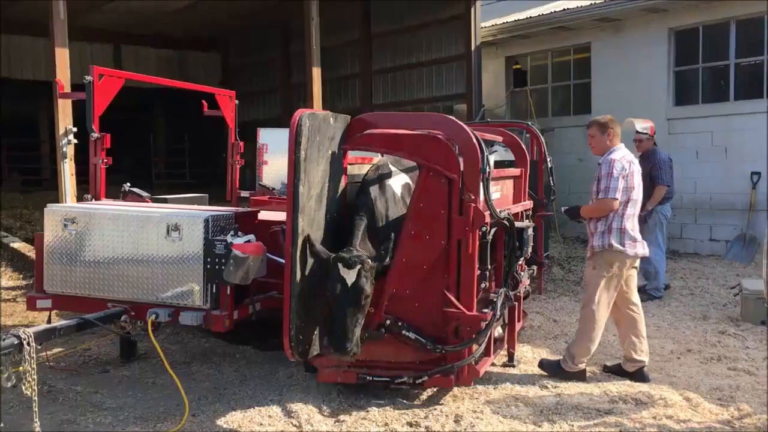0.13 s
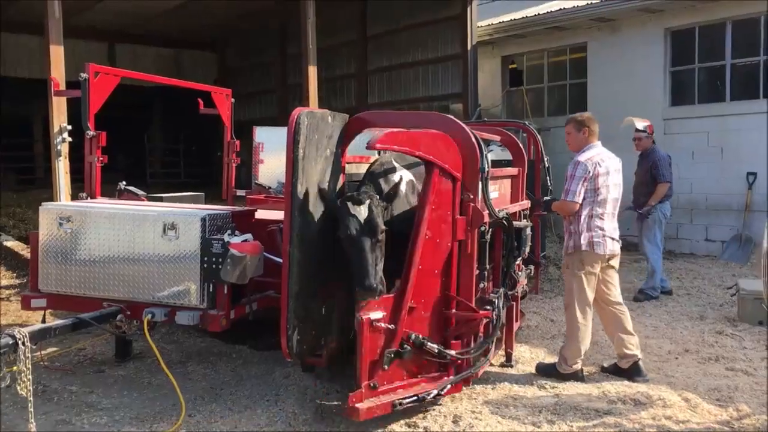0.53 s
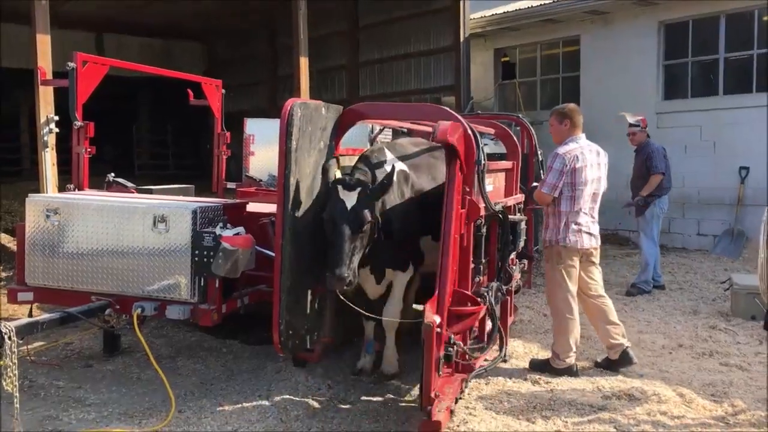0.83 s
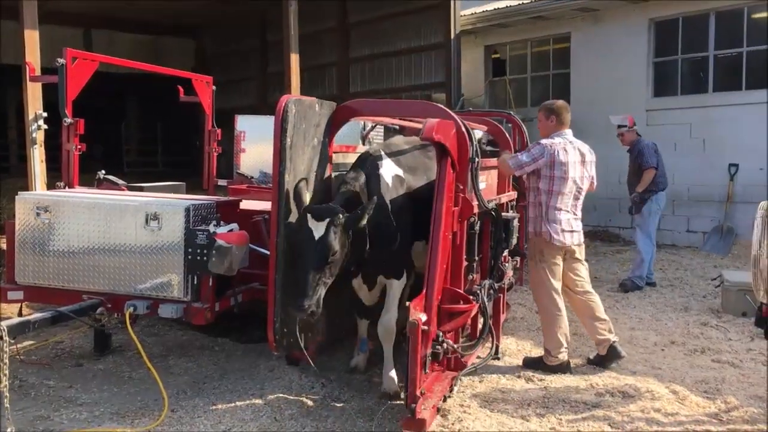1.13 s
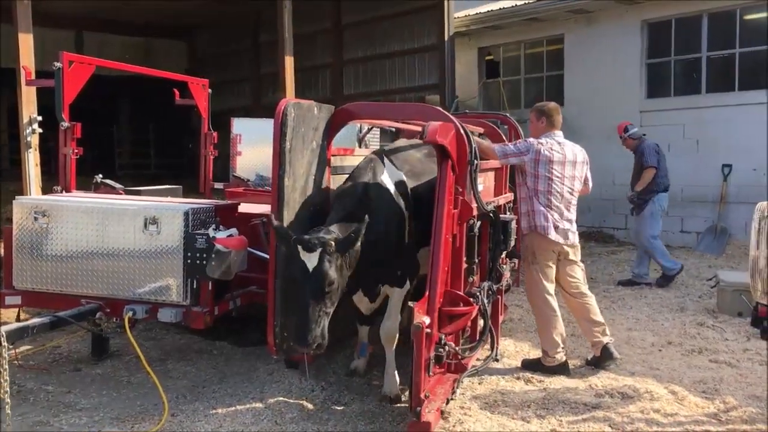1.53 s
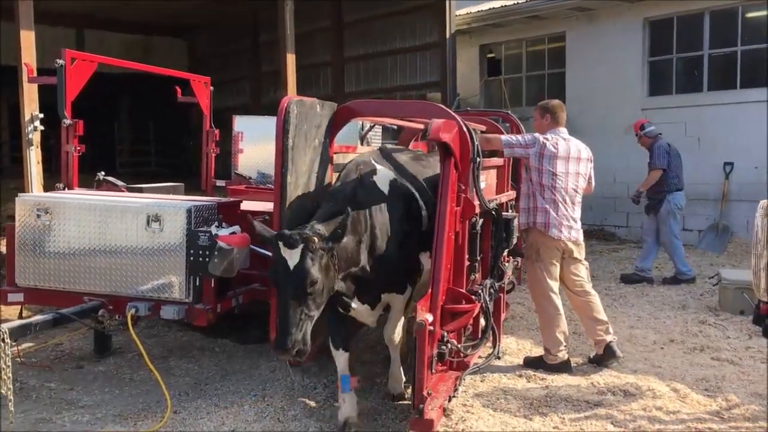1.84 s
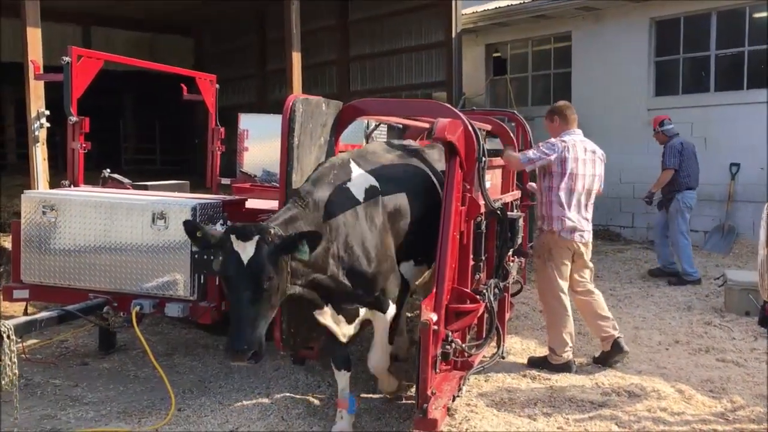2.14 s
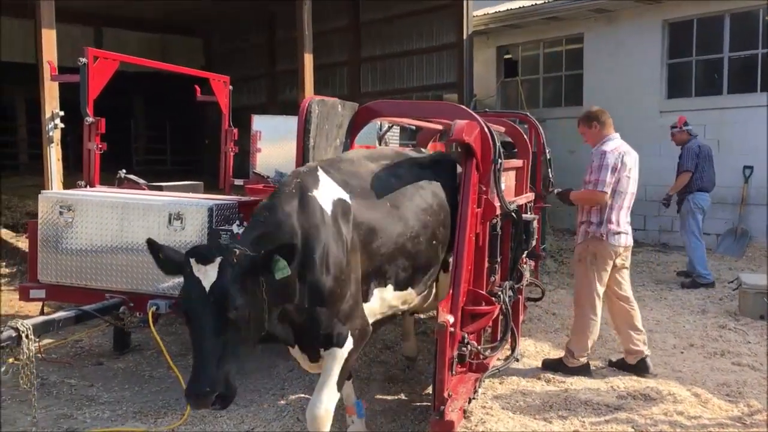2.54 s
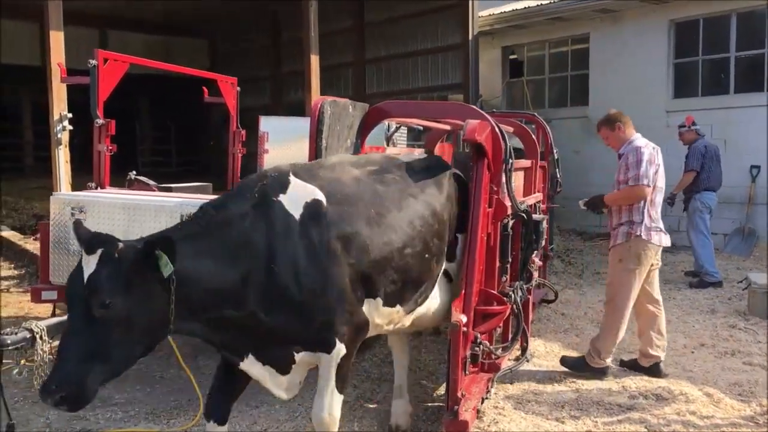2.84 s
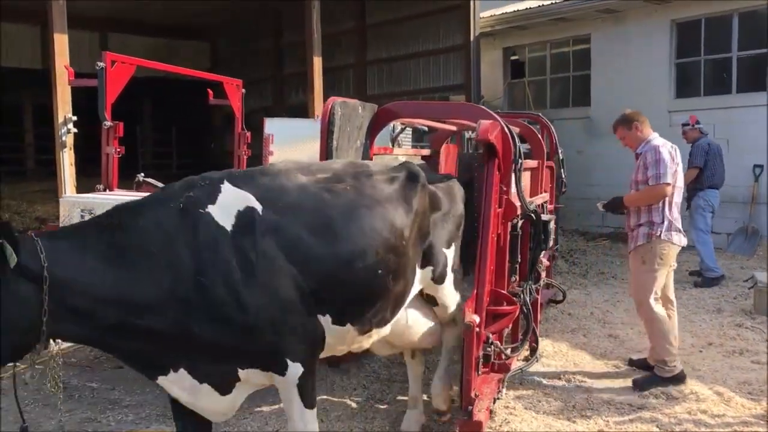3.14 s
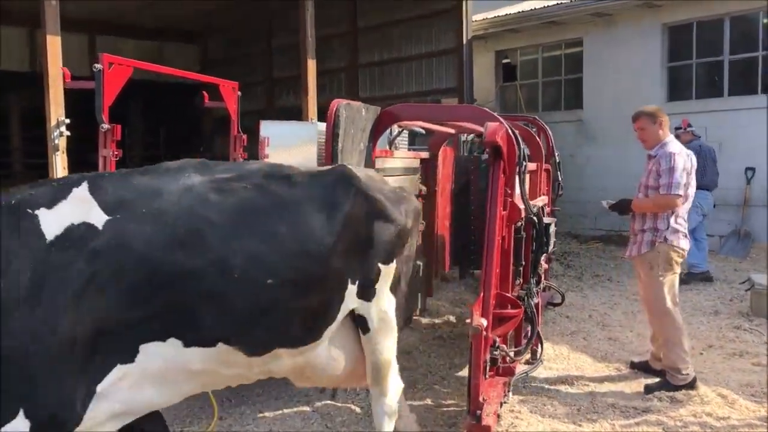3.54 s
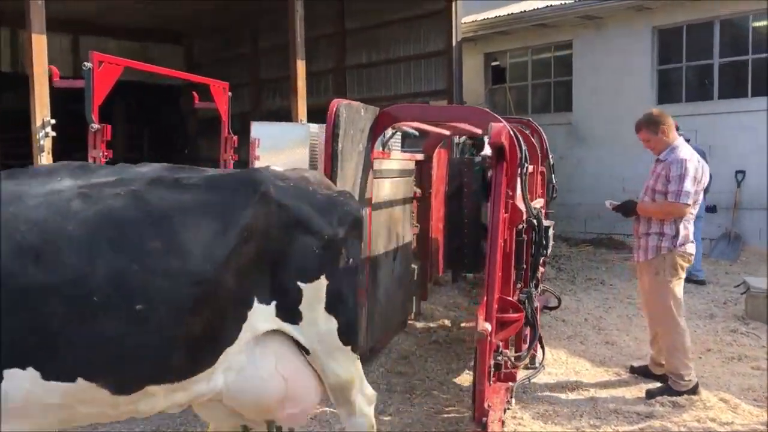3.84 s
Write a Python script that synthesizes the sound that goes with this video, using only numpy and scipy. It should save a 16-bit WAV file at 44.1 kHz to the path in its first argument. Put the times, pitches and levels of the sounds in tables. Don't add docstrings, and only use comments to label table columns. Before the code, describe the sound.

A steel cattle chute gate rattles at its latch, bangs and bounces with jingling links, then a cow's hooves thud out while machinery drone and wind rise; outdoor barn yard, phone microphone.

```python
import sys
import numpy as np
from scipy import signal
from scipy.fft import rfft, irfft
from scipy.io import wavfile
from scipy.ndimage import uniform_filter1d

SR = 44100
rng = np.random.default_rng(int(sys.argv[2]) if len(sys.argv) > 2 else 0)


def file_out(sig):
    cols = np.atleast_2d(sig).T
    lim = np.clip(cols, -1, 1)
    pcm = np.round(lim * 32767).astype(np.int16)
    wavfile.write(sys.argv[1], SR, pcm)


def volts(x):
    e = np.asarray(x, float) / 20
    return 10 ** e


N = 176400
T = np.arange(N) / SR
FREQ = np.arange(N // 2 + 1) * SR / N


def unit(x):
    return x / np.sqrt(np.mean(x ** 2))


def walk(rate):
    hold = int(SR / rate)
    steps = np.repeat(rng.standard_normal(N // hold + 1), hold)
    return unit(uniform_filter1d(uniform_filter1d(steps, hold), hold)[:N])


def bands(colour, flicker_db, rate):
    hz, db = np.array(colour).T
    f = FREQ + 1e-9
    spec = rfft(rng.standard_normal(N)) * volts(np.interp(np.log(f), np.log(hz), db))
    spec = spec * (f > hz[0]) * (f < hz[-1] * 1.02)
    first, last = np.floor(2 * np.log2(hz[0])), 2 * np.log2(hz[-1])
    out = 0
    for k in np.arange(first, last + 1):
        overlap = np.clip(1 - abs(2 * np.log2(f) - k), 0, 1)
        out = out + irfft(spec * overlap, N) * volts(flicker_db * walk(rate))
    return unit(out)


def ring(hz, db, t60, t):
    decay = np.exp(-np.log(1000) * t / t60[:, None])
    return (volts(db)[:, None] * np.sin(2 * np.pi * hz[:, None] * t) * decay).sum(axis=0)


def add(out, s, x):
    i = int(s * SR)
    out[i:i + len(x)] += x[:len(out) - i]


def bandpass(x, lo_hz, hi_hz):
    return signal.sosfilt(signal.butter(2, [lo_hz, hi_hz], "bandpass", fs=SR, output="sos"), x)


# time in seconds, level in dB, treble tilt in dB.
MACHINE_LEVEL = [(.15, -80, 2), (.22, -66, -0.5), (.45, -64, -0.5), (.7, -58.5, 2.5), (.95, -52.5, 1),
                 (1.2, -49, -1.5), (1.8, -47, 0.5), (2.2, -46.5, 1.5), (2.8, -44.5, 2), (3.05, -41.5, -0.5),
                 (3.5, -43, 2.5), (4.0, -40.5, 1)]
# frequency in Hz, density in dB per Hz.
PUMP_COLOUR = [(150, -40), (250, -3), (392, -12), (526, -3), (884, -4), (1110, -2), (1250, -4), (4200, -14),
               (5460, -28), (9240, -120)]
# frequency in Hz, density in dB per Hz.
FAN_COLOUR = [(2470, -73), (4200, -17), (4980, -7.5), (5380, 1.5), (7560, -2.5), (9360, -1.5), (10300, -6),
              (12500, -1), (15600, -5)]
FAN_DB, FLICKER_DB = -13.5, 1.45


def machine():
    s, level_db, tilt_db = np.array(MACHINE_LEVEL).T
    pump = bands(PUMP_COLOUR, FLICKER_DB, 12)
    fans = bands(FAN_COLOUR, 0.66 * FLICKER_DB, 22.07)
    fans = volts(FAN_DB + np.interp(T, s, tilt_db)) * fans
    return volts(np.interp(T, s, level_db)) * (pump + fans)


# time in seconds, level in dB, boom of the frame in dB relative to it.
GUSTS = [(.16, -85, 6), (.3, -67, 9), (.7, -55.5, -5), (.97, -55.5, -8), (1.04, -48, 2.5),
         (1.35, -38.5, -6), (1.43, -45.5, -3), (1.7, -39, -6.5), (1.82, -45.5, -9.5), (2.0, -43.5, -13.5),
         (2.25, -45.5, -7), (2.45, -40, -13.5), (2.7, -45, -8.5), (2.85, -38.5, -12), (3.15, -34.5, -10.5),
         (3.3, -40, -8.5), (3.65, -36.5, -13.5), (4.0, -39.5, -12)]
# frequency in Hz, density in dB per Hz.
BUFFET_COLOUR = [(12, -45), (20, -31), (48, 1), (76, 2), (140, -3.5), (400, -31.5), (520, -41), (880, -120)]
# frequency in Hz, density in dB per Hz.
FRAME_COLOUR = [(90, -1.5), (160, -0.5), (270, -5), (340, -13.5)]
GUST_DB = 1.5


def wind():
    s, level_db, boom_db = np.array(GUSTS).T
    boom = volts(np.interp(T, s, boom_db)) * bands(FRAME_COLOUR, GUST_DB, 11)
    buffeting = bands(BUFFET_COLOUR, GUST_DB, 8.7)
    return volts(np.interp(T, s, level_db)) * (buffeting + boom)


# start in seconds, level in dB, lowest frequency in Hz.
GRAVEL = [
    (.23, -59, 5000),
    (1.384, -40, 9000),
    (1.68, -48, 7400),
    (2.776, -43, 9200),
    (3.257, -42, 7600),
    (3.515, -40, 9300),
]
SNAP_S = 0.0011


def grit():
    out, t = np.zeros(N), T[:SR // 50]
    for s, db, lo_hz in GRAVEL:
        snap = rng.standard_normal(len(t)) * np.exp(-t / SNAP_S)
        highpass = signal.butter(4, lo_hz, "highpass", fs=SR, output="sos")
        add(out, s, 2 * volts(db) * signal.sosfilt(highpass, snap))
    return out


# lowest and highest mode in Hz, decay time T60 in seconds,
# plain crack in dB and yard tail in dB, both relative to the ringing.
STEEL_PARTS = [
    (420, 880, .08, -4, -3),
    (950, 2100, .055, -3, -6),
    (2100, 4300, .045, -3, -6),
    (4400, 14000, .022, -1, -7),
]
CONTACT_S, YARD_T60_S, ROUGHNESS_DB = 0.0098, 0.27, 3.0


def blow(bar_db, low_db, panel_db, tick_db):
    t, n, out = T[:SR // 5], SR // 25, 0
    rise = np.clip(t / 0.0013, 0, 1)
    roughness = volts(ROUGHNESS_DB * rng.exponential(size=n))
    touch = rng.standard_normal(n) * roughness * np.exp(-T[:n] / CONTACT_S) * rise[:n]
    yard = np.clip(t / 0.0066, 0, 1) * np.exp(-np.log(1000) * t / YARD_T60_S)
    end_fade = np.clip((t[-1] - t) / .05, 0, 1)
    levels = (bar_db + panel_db, bar_db + low_db, bar_db, bar_db + tick_db)
    for (lo_hz, hi_hz, t60, crack_db, yard_db), db in zip(STEEL_PARTS, levels):
        place, weak, damping = rng.random((3, 26))
        modes = ring(lo_hz * (hi_hz / lo_hz) ** place, -12 * weak, t60 * (0.66 + damping), t[:SR // 12])
        ringing = unit(np.pad(signal.fftconvolve(modes, touch), (0, len(t)))[:len(t)])
        noise = bandpass(rng.standard_normal(len(t)), lo_hz, hi_hz)
        crack = noise * rise * np.exp(-t / (CONTACT_S + t60 * 0.032))
        tail = noise * yard
        x = ringing + volts(crack_db) * crack / np.std(crack) + volts(yard_db) * tail / np.std(tail)
        x = x * end_fade
        peak = np.sqrt(uniform_filter1d(x ** 2, size=180).max())
        out = out + x * volts(db) / peak
    return out


# start in seconds, high bar level in dB, then low bar, panel and tick
# levels in dB relative to the high bar.
LATCH_BLOWS = [(0.2306, -56.5, 3, 8, -10), (.237, -61.5, 11.5, 10, -12), (.256, -57, -1, 11.5, -1.5),
               (0.2889, -61.5, 6, 9, -11), (0.3132, -54.5, 4, 4.5, -13), (0.3477, -57.5, -2, 4, -2.5),
               (.3772, -62, -2, 4, -14), (.4324, -65.5, -3, -6, .5), (.445, -71, -2, -11, -3),
               (0.467, -56.5, -8, -7, -3), (.490, -51, -2, 1, -14), (.5194, -44.5, -1, 6, -14),
               (.5351, -56.5, 6, 13, -24), (.5577, -47.5, 3, 7, -4.5), (.580, -51, 2, 6.5, -12),
               (.589, -59, 0, 4, -10), (.6098, -67, 0, 1, -21)]
# start in seconds, high bar level in dB, then low bar, panel and
# tick levels in dB relative to the high bar.
GATE_BLOWS = [(.9655, -51, 2, 8, -22), (.9705, -34.5, -3.5, -7.5, -7), (.9764, -44.5, -2, 5, 4),
              (1.0044, -52, 0, 10, -3), (1.0185, -43, 1, -1, 0.5), (1.0547, -40.5, 1, -20, 3.5),
              (1.0619, -47.5, 5, 0.5, -12), (1.075, -56, 0, -1, 8), (1.0869, -47, 2, 6.5, -3),
              (1.1005, -42.5, 5.5, 1, -16), (1.136, -58, 0, 11, -20), (1.148, -44.5, 0, 0, -21),
              (1.1705, -53.5, -5, 7, 6), (1.1775, -47, 6, 9, -22), (1.1942, -47.5, 7, 8.5, -30),
              (1.2385, -58, -3, 20, -14), (1.2775, -44, -3, 2, -11.5), (1.3083, -52.5, 6, 12, -18),
              (1.3564, -44.5, 5.5, 3, -14), (1.3814, -50.5, 2, 9, -19), (1.396, -52, -2, 9, 7.5),
              (1.4985, -58, 3, 9, 3), (1.5135, -39.5, 4, -3.5, -15), (1.5425, -41, 1, 2, -30),
              (1.613, -45, -8, 1.5, -5.5), (1.6789, -55.5, 0, 12, 1)]
# start in seconds, high bar level in dB, then low bar, panel
# and tick levels in dB relative to the high bar.
HOOF_BLOWS = [(1.88, -56, -3, -7, 0), (1.898, -51.5, 6.5, -8, -5), (2.218, -56.5, 11.5, 5, -20),
              (2.27, -52.5, 6, -4, -20), (2.895, -49, 6, 7.5, -20), (2.908, -52.5, 6, 12.5, -20),
              (2.924, -51.5, 5, 13, -25), (2.945, -54, 3, 12, -20), (2.996, -46, 6.5, 6, -9),
              (3.105, -52, -2, 12.5, -22), (3.869, -55, 0, 0, -15)]


def gate():
    out = np.zeros(N)
    for s, *levels in LATCH_BLOWS + GATE_BLOWS + HOOF_BLOWS:
        add(out, s, blow(*levels))
    return out


# start in seconds, frequency in Hz, level in dB, decay time T60 in seconds.
LINKS = [(.231, 5800, -62, .06), (.234, 7750, -59, .2), (.237, 633, -48, .08), (.252, 8450, -56, .06),
         (.256, 654, -46, .06), (.468, 4500, -54, .03), (.522, 700, -39, .07), (.535, 600, -41, .07),
         (.970, 4030, -31.5, .035), (.975, 929, -39, .08), (.976, 11600, -42, .06), (.977, 3960, -33, .04),
         (1.019, 3400, -39, .035), (1.021, 5800, -44, .04), (1.022, 3950, -39, .09),
         (1.056, 8800, -43, .06), (1.075, 8800, -50, .12), (1.063, 1590, -39, .07), (1.063, 926, -42, .06),
         (1.172, 8800, -45, .03), (1.245, 15600, -62, .1), (1.278, 4000, -43, .03),
         (1.275, 15600, -52, .12), (1.396, 11600, -40, .04), (1.517, 1250, -38, .05),
         (1.544, 3410, -40, .04), (1.882, 11500, -51, .06), (1.881, 9225, -56, .1),
         (1.897, 9225, -47.5, .5), (1.895, 5817, -51, .3), (1.925, 8716, -53, .16), (1.95, 10450, -61, .4),
         (1.96, 5817, -55, .1), (1.98, 8716, -60, .5), (2.997, 1460, -39, .05), (2.998, 720, -37, .07)]
FREE_S, CAUGHT_S = .058, .006
RATTLE_DB, RATTLE_HZ = 3, 90


def chain():
    out, t = np.zeros(N), T[:SR // 8]
    shape = np.clip(t / 0.0019, 0, 1) * np.exp(-np.clip(t - FREE_S, 0, 1) / CAUGHT_S)
    for s, hz, db, t60 in LINKS:
        add(out, s, ring(np.array([hz]), np.array([db]), np.array([t60]), t) * shape)
    return out * volts(RATTLE_DB * walk(RATTLE_HZ))


# start in seconds, level in dB, pitch in Hz.
FOOTFALLS = [
    (0.53, -43, 65.4),
    (1.338, -34.5, 66),
    (2.3, -35, 70),
    (2.29, -25.5, 62.4),
    (2.333, -24, 54.4),
    (2.48, -28, 76),
    (2.555, -23, 73),
    (3.866, -23.5, 77.7),
    (2.6, -26, 60),
]
THUD_T60_S = 0.15


def thuds():
    out, t = np.zeros(N), T[:SR // 4]
    for s, db, hz in FOOTFALLS:
        modes_hz, modes_db = hz * np.array([1, 1.9, 3.3]), db - np.array([0, 5., 13.])
        thud = ring(modes_hz, modes_db, THUD_T60_S * np.array([1, .7, .4]), t)
        add(out, s, -thud * np.clip(t / 0.0046, 0, 1))
    return out


def scene():
    mono = machine() + wind() + grit() + gate() + chain() + thuds()
    return np.array([mono, mono])


DROPOUTS = [.251, .357, 1.378, 1.595, 1.935, 2.277, 2.426, 2.533, 3.92]
LOST_S, LOST_HZ, LOST_DB, KEPT_SHARE = .005, 3300, -21, .16


def treble_dropouts(spec):
    out = irfft(spec, N)
    link_distance = abs(FREQ[:, None] - np.array([5817, 8716, 9225])).min(axis=1)
    slope = np.clip((FREQ - LOST_HZ) / 1500, 0, 1)
    for s in DROPOUTS:
        lost = rng.random(SR // 2 // 350 + 1) > KEPT_SHARE
        lost = np.repeat(lost, 350 * N // SR)[:len(FREQ)] * (link_distance > 150)
        gain = volts(LOST_DB * np.exp(-((T - s) / LOST_S) ** 2))
        out = out + irfft(spec * lost * slope, N) * (gain - 1)
    return out


# centre in seconds, centre in Hz.
WIDE_BANDS = [(.7, 4700), (1.465, 5800), (2.0, 6300), (2.0, 9700), (2.3, 10400), (2.462, 4700),
              (2.462, 7600), (2.625, 5800), (3.065, 7300), (3.112, 7000), (3.275, 5300), (3.345, 12500),
              (3.715, 12500)]
APART_HZ, APART_S, APART_DB = 760, 0.017, -3.5


def channel_difference(spec):
    side = 0
    for s, hz in WIDE_BANDS:
        turned = irfft(1j * spec * (abs(FREQ - hz) < APART_HZ), N)
        side = side + turned * volts(APART_DB) * np.exp(-((T - s) / APART_S) ** 4)
    return side


def low_pass(x):
    return signal.sosfilt(signal.butter(12, 16370, fs=SR, output="sos"), x)


def record(dry):
    spec = rfft(dry[0]) * (FREQ < 15850)
    mid = treble_dropouts(spec)
    side = channel_difference(spec)
    fade = np.clip((T - 0.155) / 0.0056, 0, 1)
    return low_pass(np.array([mid + side, mid - side]) * fade)


dry = scene()
out = record(dry)
file_out(out)
```